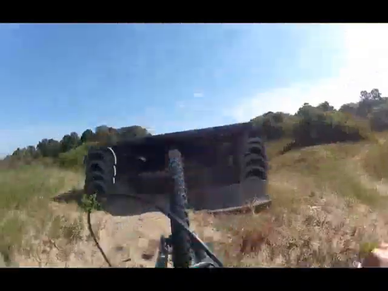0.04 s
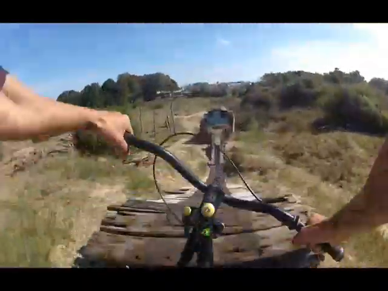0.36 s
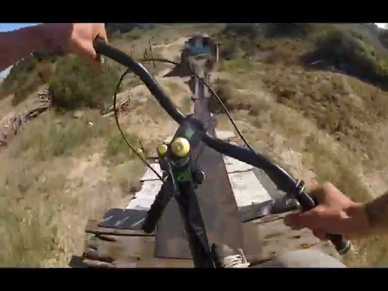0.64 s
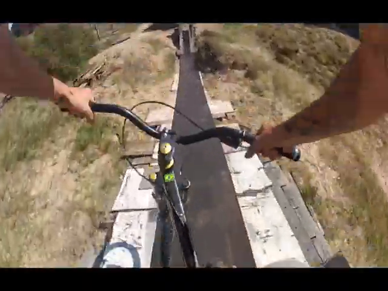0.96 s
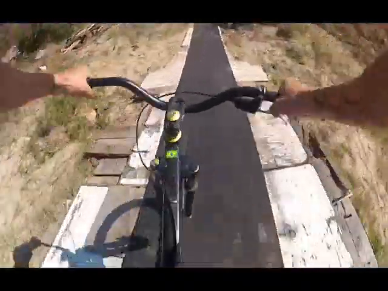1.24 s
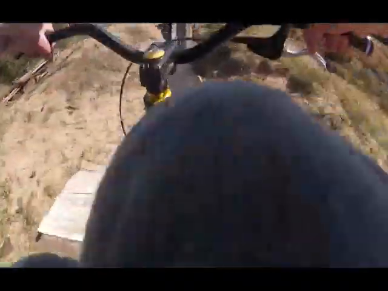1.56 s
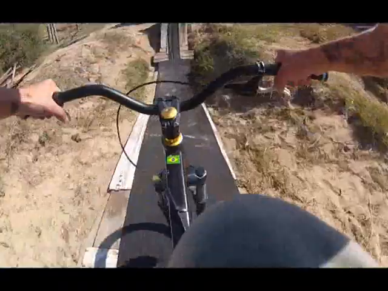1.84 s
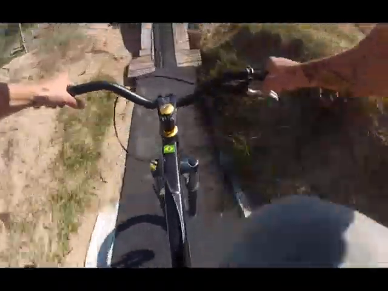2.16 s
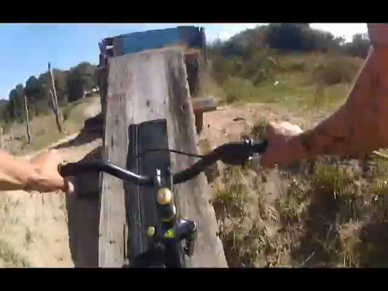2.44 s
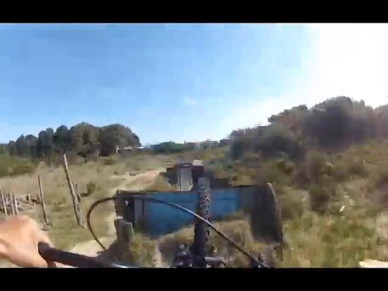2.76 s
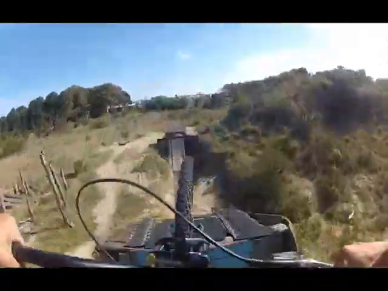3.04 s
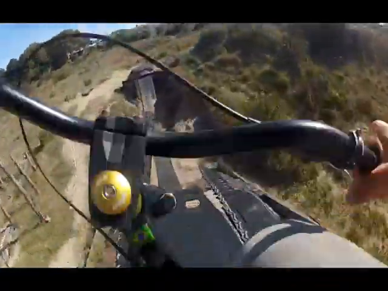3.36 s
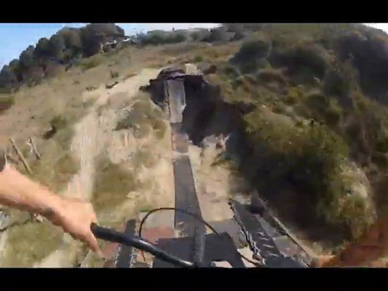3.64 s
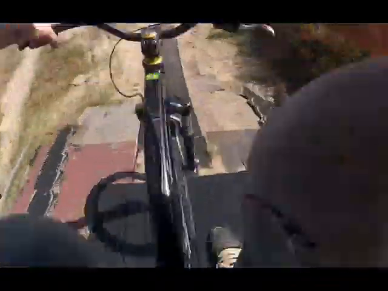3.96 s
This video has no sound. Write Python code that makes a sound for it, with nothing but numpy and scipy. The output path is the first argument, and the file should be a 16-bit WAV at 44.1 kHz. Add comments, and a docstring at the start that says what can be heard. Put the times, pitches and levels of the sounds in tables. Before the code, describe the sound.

Mountain bike tyres drum and knock across wooden boards, the bike clattering in buffeting wind.

```python
"""Mountain bike on wooden ramps

The microphone rides with the rider, out in the wind, which buffets it all the way down.
Just below, the tyres drum and hiss on the boards, and the boards knock under them.
Frame and chain clatter close by on landings; in the quiet stretches the freewheel ticks."""
import sys
import numpy as np
from scipy import signal
from scipy.fft import rfft, irfft
from scipy.io import wavfile
from scipy.ndimage import uniform_filter1d

SR = 44100
rng = np.random.default_rng(int(sys.argv[2]) if len(sys.argv) > 2 else 0)


def generate_wav(signal):
    """Clip the signal to [-1, 1] and save it as 16-bit WAV at the path in sys.argv[1]."""
    frames = np.transpose(np.atleast_2d(signal))
    scaled = np.clip(frames, -1, 1) * 32767
    pcm = np.round(scaled).astype(np.int16)
    wavfile.write(sys.argv[1], SR, pcm)


N = 176400


def amp(db):
    """Decibels to gain."""
    return 10 ** (np.asarray(db) / 20)


def unit_rms(x):
    """Scale to unit level."""
    return x / np.sqrt(np.mean(x ** 2) + 1e-20)


def curves(rows):
    """Join timed rows by straight lines: one curve for each column after the time."""
    times, *columns = np.transpose(rows)
    return [np.interp(np.arange(N) / SR, times, column) for column in columns]


def coloured(x, colour):
    """Shape a signal's spectrum; unit level."""
    hz, db = np.transpose(colour)
    freqs = np.maximum(np.arange(N // 2 + 1) * SR / N, 1)
    gain = amp(np.interp(np.log(freqs), np.log(hz), db))
    return unit_rms(irfft(rfft(x) * gain, N))


def drift(corner_hz):
    """A slow random wander of unit level."""
    freqs = np.arange(N // 2 + 1) * SR / N
    return unit_rms(irfft(rfft(rng.standard_normal(N)) / (1 + (freqs / corner_hz) ** 2), N))


def steady_noise(colour, window):
    """Coloured noise whose level is held even over `window` samples."""
    noise = coloured(rng.standard_normal(N), colour)
    power = uniform_filter1d(uniform_filter1d(noise * noise, window), window)
    return noise / np.sqrt(power + 1e-9)


def clicks(times, gains):
    """Single clicks at the given times."""
    out = np.zeros(N)
    np.add.at(out, np.clip((np.asarray(times) * SR).astype(int), 0, N - 1), gains)
    return out


def dying(start, db, decay_s):
    """An envelope that jumps up and dies away."""
    age = np.arange(N) / SR - start
    return amp(db) * (age >= 0) * np.exp(-np.clip(age / decay_s, 0, 40))


def grains(per_s, spread_db):
    """Random clicks of either sign; the spread makes their sizes uneven."""
    sizes = amp(spread_db * np.minimum(rng.exponential(1, N), 4)) * rng.choice([-1, 1], N)
    return sizes * (rng.random(N) < per_s / SR)


def ring(force, modes, t60_s):
    """A force rings damped modes, alternating in sign."""
    out, radius = 0, np.exp(-np.log(1000) / (t60_s * SR))
    for k, (hz, db) in enumerate(modes):
        angle = 2 * np.pi * hz / SR
        poles = [1, -2 * radius * np.cos(angle), radius * radius]
        out = out + (-1) ** k * amp(db) * signal.lfilter([0, np.sin(angle)], poles, force + 1e-18)
    return out


def struck(times, gains, modes, t60_s):
    """Every blow sets each mode ringing with a random strength of its own."""
    strengths = rng.standard_normal((len(times), len(modes))).T
    return sum(ring(clicks(times, gains * own), [mode], t60_s) for mode, own in zip(modes, strengths))


# Wind right on the microphone. Each row: time in seconds, level in dB.
WIND_LEVELS = [(0,2.5),(.07,-27),(.15,-8.5),(.21,-17),(.55,-19),(.69,-17),(.77,-10),(.99,-18),(1.3,-11),(1.64,-20),(1.75,-13.5),(2,-12.5),(2.44,-5),(2.64,-21.5),(2.88,-14),(3.26,-27.5),(3.6,-21),(3.92,-25),(4,-14)]
# Its spectrum. Each row: frequency in Hz, relative density in dB.
WIND_COLOUR = [(15,-18.5),(50,0.5),(135,-1),(300,-12.5),(650,-27),(1050,-46),(1500,-56),(4000,-68)]
def wind(buffet_db=0.98):
    """Air buffets the microphone with a lumpy low rumble."""
    level_db, = curves(WIND_LEVELS)
    return amp(level_db + buffet_db * drift(5.5)) * steady_noise(WIND_COLOUR, window=1800)


# The freewheel, faint from the rear hub. Each row: time in seconds, ticks per second, level in dB.
COASTING = [(.3,44,-51),(.9,40,-58),(2.9,47,-55),(3.8,46,-53.5)]
# The hub's ring. Each row: frequency in Hz, relative level in dB.
HUB_MODES = [(2690,-1),(3170,1.5),(4200,3.5),(4700,2.5),(7370,1),(7800,1)]
def freewheel(pawl_lag_s=0.0036, click_decay_s=0.0017, click_db=-1, waver=0.11, uneven_db=4):
    """Two pawls skid over each tooth in turn, at a wavering pace; the hub's modes swell and fade."""
    rate, level_db = curves(COASTING)
    teeth_passed = np.cumsum(rate * (1 + waver * drift(9.2))) / SR
    tooth_times = np.flatnonzero(np.diff(np.floor(teeth_passed))) / SR
    times = np.concatenate([tooth_times, tooth_times + pawl_lag_s])
    jitter, strength = rng.standard_normal((len(times), 2)).T
    drops = clicks(times + .0012 * jitter, amp(uneven_db * np.tanh(strength)))
    envelope = signal.lfilter([1], [1, -np.exp(-1 / (click_decay_s * SR))], drops)
    skid = envelope * rng.standard_normal(N)
    hub = sum(ring(skid * amp(uneven_db * np.tanh(drift(10))), [mode], t60_s=.06) for mode in HUB_MODES)
    return amp(level_db) * unit_rms(unit_rms(hub) + amp(click_db) * coloured(skid, BRIGHT_COLOUR))


# The chain shakes, down by the pedals. Each row: start in seconds, level in dB, decay in seconds.
JINGLES = [(0.1995,-19.5,0.0074),(1.475,-22,0.0091),(3.163,-28,0.0057),(3.174,-30,0.0059),(3.452,-27.5,0.015),(3.8415,-34.5,0.018)]
# The links' ring. Each row: frequency in Hz, relative level in dB.
LINK_MODES = [(3190,3),(3650,-3.5),(4200,3),(4900,0),(7500,0.5),(8800,-3.5)]
# The chain slaps the frame. Each row: start in seconds, level in dB.
SLAPS = [(2.654,-11.5),(2.8523,-24),(3.046,-36)]
# The clink of a slap. Each row: frequency in Hz, gain in dB.
CLINK_MODES = [(2100,-4.5),(3250,-2.5),(3600,-3),(8600,-7)]
def chain(link_t60_s=0.008):
    """Links touch in quick dying clusters and ring; now and then the chain clinks on the frame."""
    touches = grains(per_s=1700, spread_db=0)
    shake = sum(dying(start, db, decay_s) for start, db, decay_s in JINGLES)
    steady_level = np.std(ring(touches, LINK_MODES, link_t60_s))
    jingles = ring(touches * shake, LINK_MODES, link_t60_s) / steady_level
    starts, slap_db = np.transpose(SLAPS)
    return jingles + ring(clicks(starts, amp(slap_db)), CLINK_MODES, t60_s=0.013)


# Clacks of the bike, close by. Each row: start in seconds, bright level in dB, dull level in dB.
CLACKS = [(0.303,-28,-34),(1.2766,-33.5,-25),(1.2966,-20,-10),(1.333,-28.5,-18),(1.3488,-32,-12.5),(1.391,-33,-19),(1.4297,-30,-18),(1.464,-23,-38),(1.6115,-27.5,-55),(1.6813,-24,-16),(1.76,-27.5,-33),(1.942,-23,-35),(2.0077,-24,-24),(2.1833,-33,-21.5),(2.467,-23,-17),(2.511,-18,-18),(2.7484,-31.5,-17.5),(2.829,-38,-22),(3.11,-38.5,-45),(3.88,-26.5,-34),(3.9491,-22,-22),(3.965,-23.5,-15.5),(3.97,-29,-14)]
# Their two spectra; the pawls share the bright one. Each row: frequency in Hz, relative density in dB.
BRIGHT_COLOUR = [(600,-22),(2600,1.5),(3700,1),(6000,-4),(8600,-4.5),(15000,-13)]
DULL_COLOUR = [(200,1),(600,9.5),(1150,-3),(2300,-13.5),(8000,-70)]
# The ring of the frame, and of the part that snaps. Each row: frequency in Hz, gain in dB.
FRAME_MODES = [(1190,-0.5),(1800,-2),(2230,-8),(2790,-1),(3740,-3.5),(5180,-8)]
SNAP_MODES = [(1206,-1.5),(1760,-4.5),(2175,-2.5),(2900,-17),(10100,-8.5),(14000,-16)]
FRAME_T60_S = 0.029
def frame(decay_s=0.0055, ring_db=-5.5, snap_at_s=1.6815, snap_db=-4):
    """Parts clack and ring the frame, and one gives a single hard snap."""
    bright = sum(dying(start, db, decay_s) for start, db, _ in CLACKS)
    bright *= steady_noise(BRIGHT_COLOUR, window=100)
    dull = sum(dying(start, db, decay_s) for start, _, db in CLACKS)
    dull *= steady_noise(DULL_COLOUR, window=150)
    starts, bright_db, dull_db = np.transpose(CLACKS)
    ringing = struck(starts, amp((bright_db + dull_db) / 2 + ring_db), FRAME_MODES, FRAME_T60_S)
    snap = ring(clicks([snap_at_s], amp(snap_db)), SNAP_MODES, t60_s=0.012)
    return bright + dull + ringing + snap


def rattle(relative_db=-8):
    """Loose parts tap the frame at random, harder as the tyres run rougher."""
    tread_db, = curves(TREAD_LEVELS)
    taps = grains(per_s=63, spread_db=4) * amp(tread_db + relative_db)
    hits = np.flatnonzero(taps)
    return struck(hits / SR, taps[hits], FRAME_MODES, FRAME_T60_S)


# Drumming and tread hiss, just below the rider. Each row: time in seconds, level in dB.
DRUM_LEVELS = [(0,-26.5),(.15,-13.5),(.25,-25),(.68,-36.5),(.82,-28),(1.03,-38.5),(1.14,-22.5),(1.33,-20.5),(1.64,-21),(1.74,-17.5),(2.2,-17.5),(2.54,-13.5),(2.84,-20),(3,-37.5),(3.84,-43),(3.88,-20.5),(4,-24.5)]
TREAD_LEVELS = [(0,-31.5),(.065,-27),(.16,-32.5),(.25,-44.5),(.7,-59),(1.28,-49),(1.33,-35.5),(1.55,-44.5),(1.97,-35),(2.12,-37.5),(2.42,-30),(2.6,-32.5),(3,-53.5),(3.83,-56.5),(3.88,-39),(3.94,-44.5),(3.97,-29),(4,-42)]
# Their spectra. Each row: frequency in Hz, relative density in dB.
DRUM_COLOUR = [(60,-8),(230,4),(500,-3),(670,-11),(850,-23),(1500,-33.5),(3000,-50)]
TREAD_COLOUR = [(300,3),(900,2),(1500,-3),(2700,3.5),(6000,-9.5),(9000,-5.5),(15000,-14.5)]
def tyres(bumpy_db=3.0, scuff_db=3.0, grit_db=-4.5):
    """The boards drum under the tyres; the tread hisses and crunches grit."""
    drum_db, = curves(DRUM_LEVELS)
    tread_db, = curves(TREAD_LEVELS)
    bumps = drift(41)
    drum = amp(drum_db + bumpy_db * bumps) * steady_noise(DRUM_COLOUR, window=1300)
    hiss = rng.standard_normal(N)
    grit = amp(grit_db) * unit_rms(grains(per_s=450, spread_db=4.5))
    scuffs = .5 * bumps + drift(23)
    return drum + amp(tread_db + scuff_db * scuffs) * coloured(hiss + grit, TREAD_COLOUR)


# The wheels strike boards right under the rider.
# Each row: start in seconds, blow in dB, board pitch in Hz, push on the ramp in dB.
KNOCKS = [(.024,-17.5,545,1.5),(.137,-11.5,552,-1),(.79,-19,325,3),(1.295,-3,491,-13),(1.715,-7,468,0.5),(1.855,-4,475,-17),(2.046,-8,450,7),(2.326,-6.5,325,-8),(2.501,-10,606,-7),(2.562,-2,281,4.5),(2.599,-7.5,646,-26),(2.66,-11,610,-7),(3.869,-9,490,-29.5),(3.969,-9,413,-29)]
# A board's ring. Each row: multiple of its pitch, gain in dB.
BOARD_MODES = [(.64,-4.5),(1.004,2),(1.28,-9.5),(1.9,-19.5)]
def boards(scrub_db=-29, scrub_s=0.018, contact_s=0.00067, thud_hz=141, lowpass_hz=1100):
    """A soft tyre blow rings one board, scrubs over it for a moment and thuds through the ramp."""
    knocks = 0
    for start, db, pitch_hz, _ in KNOCKS:
        scrub = dying(start, db + scrub_db, scrub_s) * rng.standard_normal(N)
        modes = [(pitch_hz * ratio, mode_db) for ratio, mode_db in BOARD_MODES]
        knocks = knocks + ring(clicks([start], amp(db)) + scrub, modes, t60_s=0.044)
    starts, _, _, push_db = np.transpose(KNOCKS)
    softness = np.exp(-1 / (contact_s * SR))
    push = signal.lfilter([1 - softness], [1, -softness], clicks(starts, amp(push_db)))
    thuds = ring(push, [(thud_hz, 0)], t60_s=0.043)
    return signal.sosfilt(signal.butter(2, lowpass_hz, fs=SR, output="sos"), knocks + thuds)


def scene():
    """Everything as it reaches the microphone on the rider, in mono."""
    return (wind() + tyres() + boards() + frame() + rattle() + chain() + freewheel())[None]


# Two dips hollow out the treble, near 6 and 10.4 kHz.
# Each row: centre in Hz, width in Hz, gain per pass in dB.
TREBLE_DIPS = [(5990,1590,-8.5),(10400,900,-4)]
def record(dry, ceiling=0.97, mirror_hz=11930, mirror_db=-23, cutoff_hz=15300):
    """The treble is hollowed, the microphone overloads, and the rumble is mirrored as a thin sizzle."""
    x = dry
    for hz, width_hz, db in TREBLE_DIPS * 2:  # two passes
        band = signal.lfilter(*signal.iirpeak(hz, hz / width_hz, fs=SR), x)
        x = x + (amp(db) - 1) * band
    clipped = x / (1 + np.abs(x / ceiling) ** 12) ** (1 / 12)
    rumble = signal.sosfilt(signal.butter(2, [232, 1000], "band", fs=SR, output="sos"), clipped)
    sizzle = amp(mirror_db) * rumble * np.cos(2 * np.pi * mirror_hz * np.arange(N) / SR)
    return signal.sosfilt(signal.ellip(10, .3, 80, cutoff_hz, fs=SR, output="sos"), clipped + sizzle)


dry = scene()
out = record(dry)
generate_wav(out)
```